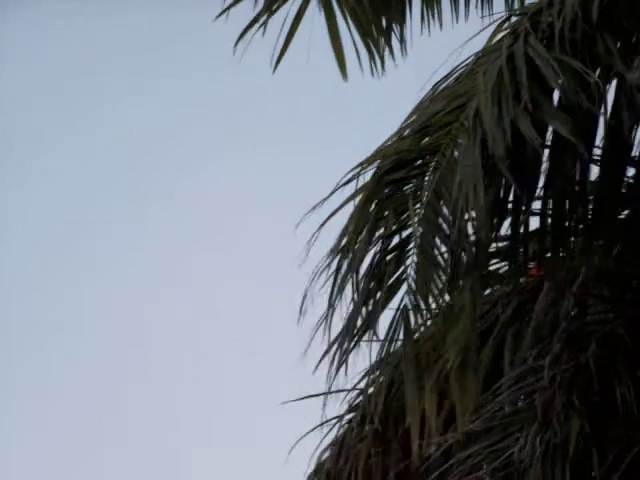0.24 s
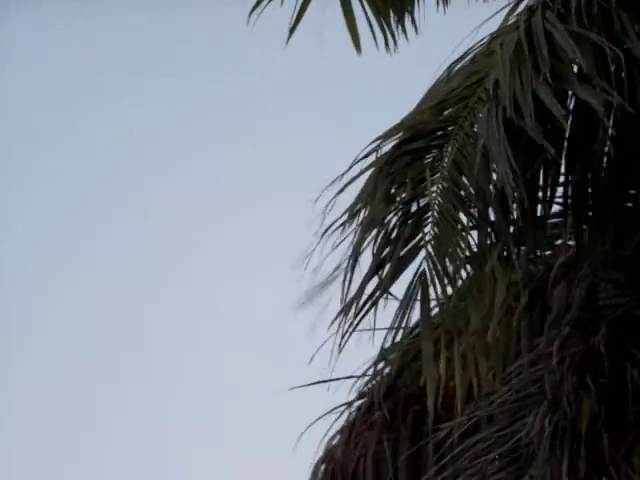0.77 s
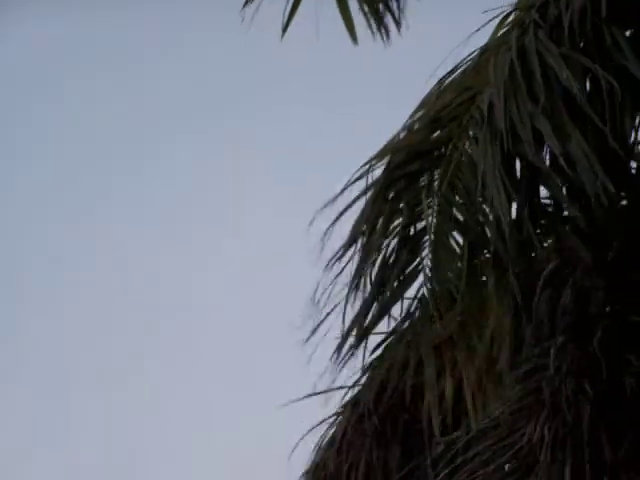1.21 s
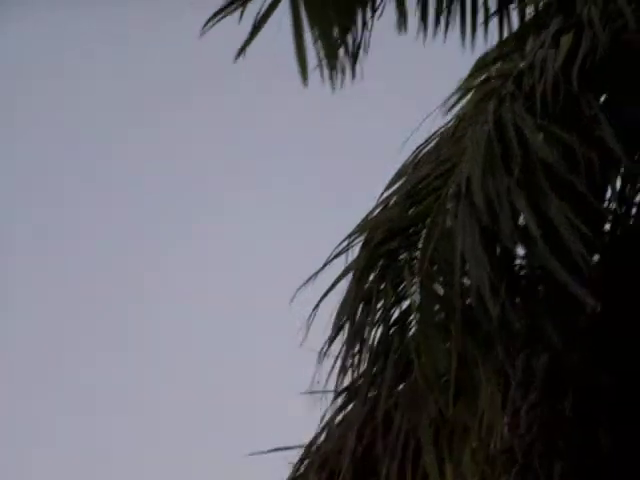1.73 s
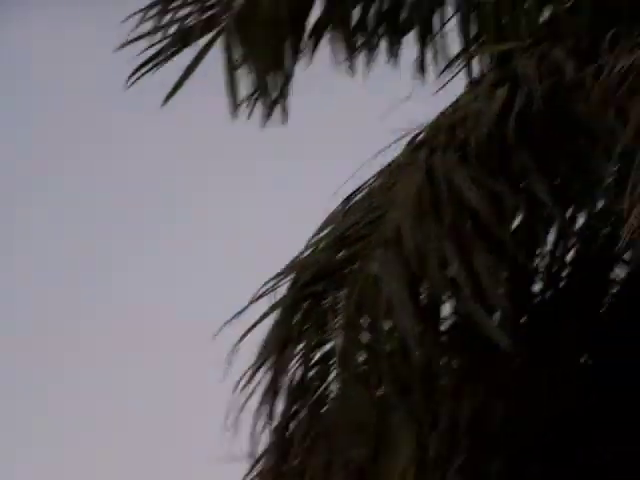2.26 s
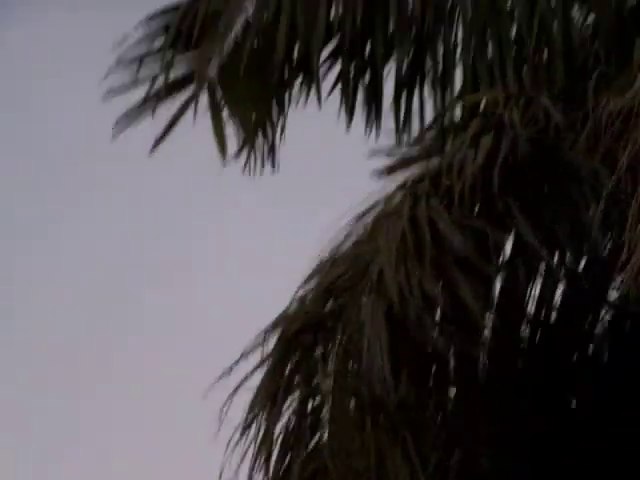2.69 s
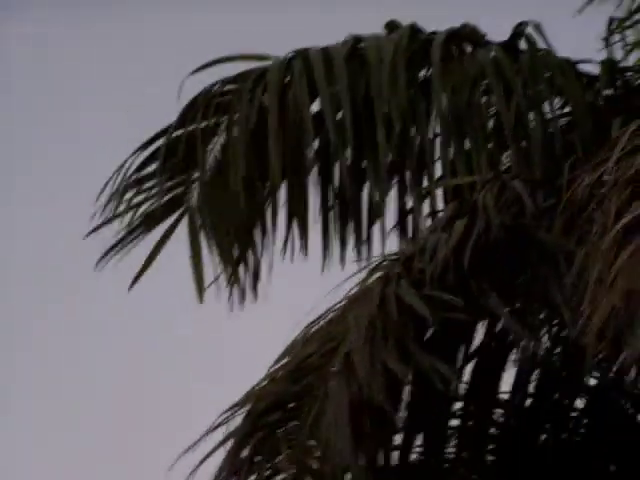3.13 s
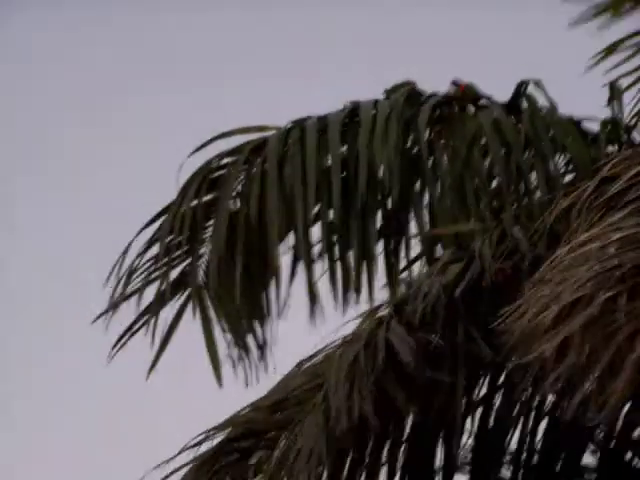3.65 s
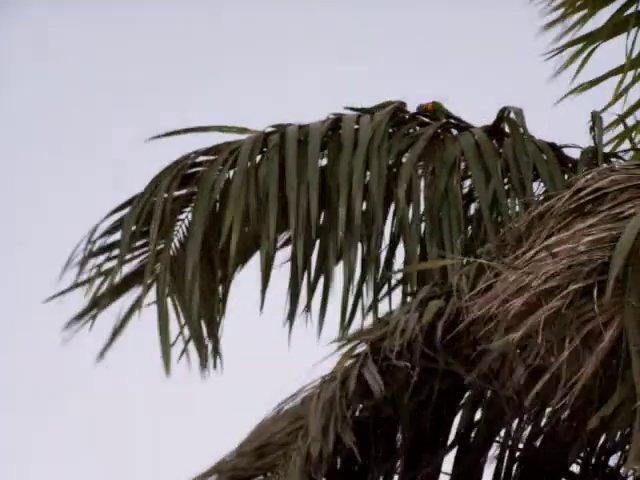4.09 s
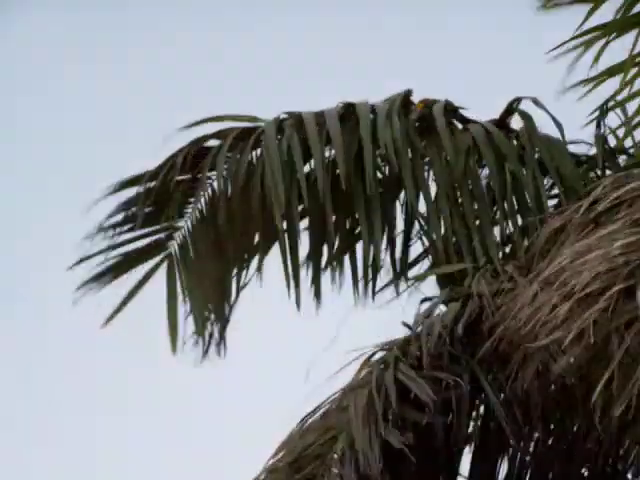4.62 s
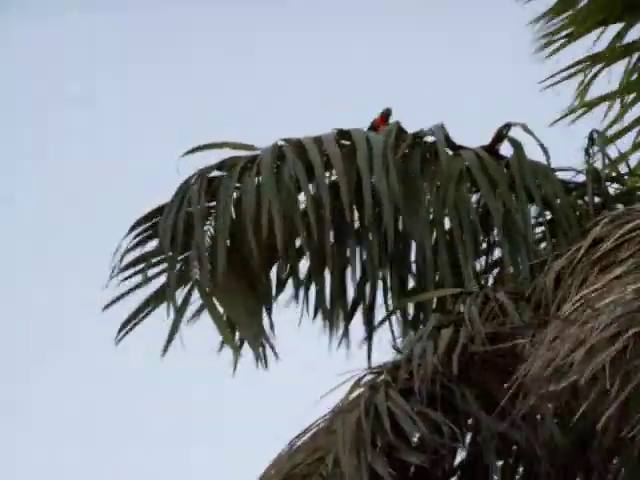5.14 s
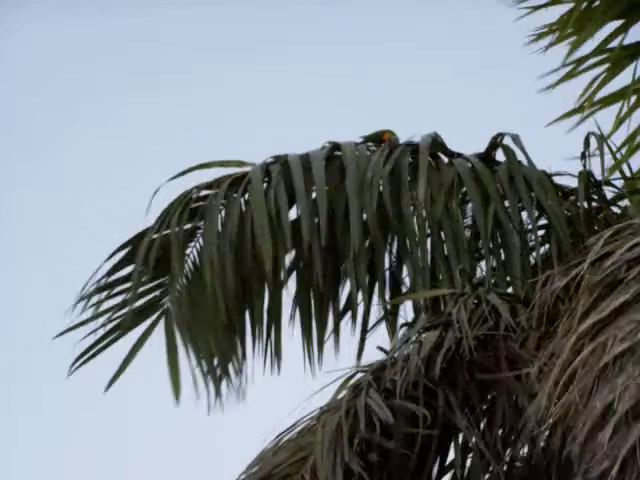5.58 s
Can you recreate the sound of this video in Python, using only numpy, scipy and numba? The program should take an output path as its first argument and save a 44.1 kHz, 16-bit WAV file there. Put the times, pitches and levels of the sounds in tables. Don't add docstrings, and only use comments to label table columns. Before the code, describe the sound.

A big flock of parrots chatters without pause in palm trees beside a road. Close birds throw out very short bent whistles and chirps, with small harsh squawks, over a blurred far crowd. A low truck drone passes early, then a car engine grows until the end. Near five seconds the closest bird trills and swoops. Small camera sound, squashed and gritty with little treble air.

```python
import sys
import numpy as np
from scipy import signal
from scipy.fft import rfft, irfft
from scipy.io import wavfile
from scipy.ndimage import uniform_filter1d
from numba import njit

SR = 44100
rng = np.random.default_rng(int(sys.argv[2]) if len(sys.argv) > 2 else 0)


def wav_record(signal):
    frames = np.transpose(np.atleast_2d(signal))
    bounded = np.clip(frames, -1, 1)
    quanta = np.round(bounded * 32767).astype(np.int16)
    wavfile.write(sys.argv[1], SR, quanta)


def voltage_ratio(level):
    return 10 ** (np.asarray(level, float) / 20)


N = 258867
TIME_S = np.arange(N) / SR
START_S = .0555


def curve(table):
    s, *columns = np.transpose(table)
    return [np.interp(TIME_S, s, c) for c in columns]


def unit(x):
    return x / np.sqrt(np.mean(x ** 2))


def colour(x, points):
    hz, db = np.transpose(points)
    grid_hz = np.fft.rfftfreq(N, 1 / SR) + 1
    gain = voltage_ratio(np.interp(np.log(grid_hz), np.log(hz), db))
    return unit(irfft(rfft(x) * gain, N))


def flutter(low_hz, high_hz):
    band = signal.butter(2, [low_hz, high_hz], "bandpass", fs=SR, output="sos")
    return unit(signal.sosfilt(band, rng.standard_normal(N)))


def fade_in_db():
    end_s = 0.23
    return -12 * np.clip((end_s - TIME_S) / (end_s - START_S), 0, 1)


@njit
def whistle(rows, shake, wobble, rasp, octave, edge_s, hook):
    out = np.zeros(len(shake))
    for start_s, length_s, first_hz, middle_hz, last_hz, gain, place in rows:
        first, size = int(start_s * SR), int(length_s * SR)
        phase = place
        slope = 4 * middle_hz - 3 * first_hz - last_hz
        curvature = 2 * (first_hz + last_hz - 2 * middle_hz)
        for i in range(min(size, len(out) - first)):
            u = i / size
            k = (int(place) + i) % len(out)
            tension = min(1., i / (edge_s * SR), (size - i) / (edge_s * SR))
            hz = first_hz + u * slope + u * u * curvature
            hz *= 1 - hook * (1 - tension) ** 2
            phase += 2 * np.pi * hz * (1 + wobble * shake[k]) / SR
            swell = np.sqrt(tension) * (1 + rasp * shake[-k - 1])
            out[first + i] += gain * swell * (np.sin(phase) + octave * np.sin(2 * phase))
    return out


def echo(x, t60_s, first_s):
    t = np.arange(int(.9 * SR)) / SR
    tail = rng.standard_normal(len(t)) * voltage_ratio(-60 * t / t60_s) * (t > first_s)
    return signal.fftconvolve(x, tail / np.sqrt(np.sum(tail ** 2)))[:N]


def chatter(shake, wobble, rasp, length_s, bend, scatter_db, count):
    pitch, start, length, first, last, level, place = rng.random((7, count))
    hz = 1800 + 6000 * pitch
    first_hz = hz * (1 - bend * (first - .3))
    last_hz = hz * (1 - bend * (last - .3))
    gain = voltage_ratio(-scatter_db * np.log(1 - .97 * level))
    rows = np.c_[start * N / SR, length_s * (.5 + 1.5 * length ** 2), first_hz, hz, last_hz, gain, place * N]
    return unit(whistle(rows, shake, wobble, rasp, .0, 0.0051, .12))


# freq_hz, density_db (dB per Hz)
CROWD = [(880, -13.5), (1500, -7), (1820, -23.5), (2110, -17), (2430, -9), (2840, -2.5), (3330, -5),
         (3890, -3), (4930, -9.5), (5840, -13), (8000, -28), (10400, -61), (17600, -120)]
# time_s, level_db
FLOCK = [(.3, -21.5), (.59, -19.5), (1.17, -19), (1.76, -18.5), (1.85, -21), (2.24, -19.5), (2.7, -19.5),
         (2.9, -18), (3.2, -18.5), (3.75, -18), (3.92, -21.5), (4.03, -19), (4.36, -17.5), (4.62, -22),
         (4.91, -21.5), (5.11, -18.5), (5.53, -21), (5.87, -17)]
# time_s, dropout_share (0-1)
HUSH = [
    (4.8, 0.03),
    (5.03, 0.5),
    (5.25, 0.1),
    (5.5, .55),
    (5.7, .1),
]


def far_crowd():
    steep = chatter(flutter(60, 500), .004, .3, length_s=.015, bend=.4, scatter_db=1.0, count=1900)
    clear = chatter(flutter(60, 500), .005, .4, length_s=.02, bend=.25, scatter_db=.5, count=1200)
    harsh = chatter(flutter(150, 900), .05, .9, length_s=.05, bend=.15, scatter_db=1.5, count=600)
    crowd = steep + voltage_ratio(-1.5) * clear + voltage_ratio(-8) * harsh
    smeared = crowd + voltage_ratio(-6) * echo(crowd, t60_s=.6, first_s=.013)
    heard = colour(smeared, CROWD)
    treble = signal.butter(2, 5200, "highpass", fs=SR, output="sos")
    heard = heard - np.clip(curve(HUSH)[0], 0, 1) * signal.sosfiltfilt(treble, heard)
    return voltage_ratio(curve(FLOCK)[0] + fade_in_db() - 1.0) * heard


# time_s, level_db
ROAD = [(.3, -36), (.59, -29.5), (1.17, -35.5), (1.76, -32.5), (1.9, -33.5), (2.9, -31), (2.97, -36.5),
        (4.5, -36), (4.72, -31.5), (4.91, -37.5), (4.98, -31), (5.11, -39.5), (5.67, -37), (5.87, -32)]
# freq_hz, density_db (dB per Hz)
TRAFFIC = [(15, -46.5), (25, -35.5), (81, -11.5), (129, -17.5), (162, -20), (401, -18.5), (1010, -8.5),
           (1840, -10.5), (2140, -12), (2500, -2.5), (3250, -3.5), (5500, -120)]
# freq_hz, density_db (dB per Hz)
TYRE_RING = [(170, -44), (235, -3), (262, -4.5), (292, -1.5), (380, -36)]


def traffic():
    level_db = curve(ROAD)[0] + fade_in_db()
    wash_db = level_db + 4.5 + 1.05 * flutter(1.6, 16.3)
    wash = voltage_ratio(wash_db) * colour(rng.standard_normal(N), TRAFFIC)
    return wash + voltage_ratio(level_db - 20.5) * colour(rng.standard_normal(N), TYRE_RING)


# time_s, hum_hz, level_db
IDLER = [
    (.1, 233.6, -62),
    (2.0, 233.7, -57),
    (2.3, 235, -61),
    (2.7, 232, -49.5),
    (3.0, 234, -73),
]


def idler():
    hz, db = curve(IDLER)
    phase = 2 * np.pi * np.cumsum(hz * (1 + 0.0078 * flutter(1, 8))) / SR
    return np.sqrt(2) * voltage_ratio(db + 2.5 * flutter(2, 10)) * np.sin(phase)


def bend(table, first_share, last_share):
    s, length, hz, db = np.transpose(table)
    return np.c_[s + .003, length - .003, hz * (1 + first_share), hz, hz * (1 + last_share), db]


def voiced(rows):
    return np.c_[rows[:, :5], np.sqrt(2) * voltage_ratio(rows[:, 5]), rng.random(len(rows)) * N]


# start_s, length_s, middle_hz, level_db
FALLING = [(3.135, 0.024, 4810, -29.5), (5.768, .027, 4230, -24.5), (.173, 0.04, 5930, -36),
           (.276, .027, 4750, -23.5), (.831, .024, 5580, -15.5), (.93, .02, 5620, -17),
           (1.264, 0.055, 2390, -29), (1.397, .032, 3160, -19), (1.57, .035, 3455, -22.5),
           (1.893, 0.025, 4450, -20), (2.561, 0.03, 5400, -27), (3.738, 0.024, 4500, -25),
           (2.195, 0.018, 6500, -33), (2.367, 0.031, 3080, -22), (2.421, 0.031, 3295, -24.5),
           (2.426, 0.032, 6440, -32), (2.435, 0.032, 2540, -23), (3.163, 0.041, 4320, -23),
           (3.64, 0.024, 4500, -23), (4.354, 0.078, 6520, -31), (5.788, 0.07, 3095, -18.5)]
RISING = [(.265, .015, 4270, -19.5), (1.146, .044, 4010, -23.5), (4.225, .07, 4400, -23),
          (5.0, .048, 4020, -21), (5.372, 0.027, 3830, -20), (3.037, 0.045, 2850, -22),
          (3.187, 0.054, 4390, -24), (4.14, 0.045, 5000, -26), (5.196, 0.031, 3825, -23),
          (5.205, 0.05, 2800, -25), (5.837, 0.07, 3110, -18)]
# start_s, length_s, middle_hz, level_db
HOOKS = [(3.297, 0.027, 5590, -25), (3.958, 0.028, 4480, -25), (.28, .037, 5970, -26.5),
         (.904, 0.035, 5840, -18.5), (.976, 0.023, 5840, -18.5), (1.186, 0.014, 4280, -23.5),
         (1.773, 0.038, 5630, -18), (1.815, 0.04, 4680, -17), (1.849, 0.024, 5620, -16),
         (2.972, 0.035, 5950, -20.5), (3.226, 0.041, 5800, -28.5), (5.427, 0.021, 5190, -21),
         (1.868, 0.03, 4600, -19)]
# start_s, length_s, middle_hz, level_db
HELD = [(.326, 0.04, 3435, -18.5), (.612, 0.076, 4820, -27.5), (.853, 0.064, 4450, -23),
        (.952, 0.036, 4690, -17), (1.718, .056, 4320, -21), (1.047, 0.04, 3640, -24),
        (.545, 0.04, 1330, -36), (1.04, 0.03, 5850, -29), (1.65, 0.027, 5930, -28),
        (1.806, 0.026, 5130, -24), (.595, .04, 1230, -37), (2.648, 0.04, 3586, -22),
        (4.724, 0.022, 4210, -19), (2.954, 0.016, 5430, -19.5), (2.995, 0.018, 5400, -24),
        (3.277, 0.023, 3860, -19), (3.608, 0.031, 4830, -20), (5.178, 0.025, 6510, -29),
        (3.772, 0.067, 2730, -25.5), (4.075, 0.068, 6260, -30), (4.091, 0.038, 3100, -22),
        (5.138, 0.029, 6550, -25), (4.58, 0.04, 5720, -28), (4.875, 0.12, 3960, -29),
        (4.938, 0.045, 6800, -33), (5.029, 0.022, 4980, -21), (5.292, 0.031, 2948, -24)]
# start_s, length_s, middle_hz, level_db
DIVES = [(.379, 0.044, 3030, -23.5), (.415, 0.03, 3250, -19), (.609, 0.077, 3160, -25),
         (.705, 0.055, 2700, -26.5), (1.207, .043, 3740, -23), (1.265, 0.026, 3870, -20),
         (1.384, 0.013, 3520, -19.5), (2.624, .026, 4200, -21), (3.352, 0.022, 4510, -22.5),
         (3.977, .04, 3410, -23.5), (5.397, 0.03, 4320, -24), (2.013, 0.015, 7070, -38),
         (2.285, 0.028, 3120, -22.5), (3.841, 0.036, 3145, -17.5), (4.666, .029, 2696, -25),
         (5.211, .019, 4020, -22.5), (5.362, 0.035, 5600, -29), (5.827, 0.027, 5720, -24)]
# start_s, length_s, middle_hz, level_db
SWOOPS = [(3.41, 0.038, 2955, -30), (3.51, 0.054, 3330, -37.5), (.467, 0.026, 3500, -21),
          (.476, 0.047, 3010, -18), (1.315, 0.045, 2936, -27.5), (2.17, 0.031, 3335, -26),
          (2.905, 0.07, 5300, -26), (2.141, .058, 6230, -27), (2.355, .016, 6600, -30),
          (3.589, 0.021, 2653, -25.5), (4.271, 0.024, 2567, -24.5), ]
# start_s, length_s, middle_hz, level_db
DIPS = [
    (.794, 0.031, 5000, -30),
    (2.282, 0.013, 3490, -18),
    (2.525, 0.05, 2800, -26.5),
    (3.898, 0.1, 2510, -26.5),
    (4.256, .009, 4360, -23),
    (4.496, 0.018, 4040, -20),
]
# start_s, length_s, middle_hz, level_db
ARCHES = [(.814, 0.03, 4800, -22.5), (1.212, .034, 6030, -27), (1.085, 0.034, 6080, -26),
          (1.704, 0.022, 5480, -23), (1.97, 0.03, 5910, -18.5), (2.557, 0.059, 3570, -18.5),
          (2.775, .017, 4230, -21), (3.84, .024, 4170, -26.5), (3.565, 0.022, 4890, -23),
          (3.708, 0.054, 4550, -26.5), (4.48, 0.031, 2540, -27), (4.498, .037, 2645, -24.5),
          (5.33, 0.04, 4640, -26)]
# start_s, length_s, middle_hz, level_db
SETTLES = [(3.252, 0.015, 4220, -24.5), (3.548, 0.058, 2605, -30.5), (1.43, 0.04, 3600, -25),
           (2.038, 0.079, 3910, -19.5), (2.203, 0.084, 3565, -21.5), (3.28, 0.06, 2750, -23),
           (3.789, 0.047, 3250, -17.5), (4.008, .04, 2726, -19.5), (4.372, 0.06, 3250, -19.5)]
# start_s, top_hz, end_sag (0-1), level_db
TRILL = [
    (4.741, 5680, .06, -24),
    (4.757, 5800, .03, -18.5),
    (4.781, 6100, .015, -24),
    (4.807, 6030, .04, -21),
    (4.822, 6040, .07, -22),
    (4.836, 6080, .06, -23),
    (4.848, 5980, .05, -26),
    (4.861, 6080, .035, -19),
    (4.883, 5900, .075, -19.5),
]


def near_birds():
    s, hz, sag, db = np.transpose(TRILL)
    trill_end_s = 4.916
    trill = np.c_[s, np.diff(np.r_[s, trill_end_s]), hz * (1 - sag), hz, hz * (1 - sag), db]
    calls = np.r_[bend(FALLING, .04, -.045), bend(RISING, -.045, .044), bend(HOOKS, -.055, 0),
                  bend(HELD, .00062, -.001), bend(DIVES, .1, -.11), bend(SWOOPS, -.105, .105),
                  bend(DIPS, .07, .065), bend(ARCHES, -.045, -.045), bend(SETTLES, .05, -.01)]
    far = calls[:, 5] < -22
    near_rows, far_rows = voiced(np.r_[trill, calls[~far]]), voiced(calls[far])
    shake = flutter(70, 500)
    notes = whistle(near_rows, shake, .005, .28, voltage_ratio(-27), .003, .07)
    notes = notes + whistle(far_rows, shake, .006, .38, voltage_ratio(-27), .004, .08)
    return notes + voltage_ratio(-14) * echo(notes, t60_s=0.14, first_s=0.012)


def engine(table, skirt_db, thud_db, fourth_db):
    hz, db, ring = curve(table)
    phase = 2 * np.pi * np.cumsum(hz * (1 + 0.0044 * flutter(1.3, 12))) / SR
    arriving = np.clip((TIME_S - table[0][0]) / 0.27, 0, 1)
    leaving = np.clip((table[-1][0] + 0.16 - TIME_S) / .15, 0, 1)
    sound = np.sqrt(2) * voltage_ratio(thud_db) * np.cos(phase)
    sound = sound + voltage_ratio(db + fourth_db) * np.cos(4 * phase)
    for k in (1, 2, 3):
        level_db = db - skirt_db * abs(np.log2(k / ring))
        sound = sound + np.sqrt(2) * voltage_ratio(level_db) * np.sin(k * phase)
    return arriving * leaving * sound


# time_s, firing_hz, level_db, ring_multiple (of firing rate)
TRUCK = [
    (.2, 51.53, -41, 2.9),
    (.58, 52.23, -43, 2.9),
    (.64, 51.6, -38, 2.45),
    (.75, 51.05, -34, 2.55),
    (1.06, 51.97, -43.5, 2.05),
    (1.5, 52.37, -40, 2.05),
    (2.2, 53.2, -51.5, 1.95),
    (2.46, 56.2, -51.5, 1.9),
    (2.8, 53.7, -65.5, 1.9),
    (3.25, 56.6, -66, 1.9),
]


def truck():
    return engine(TRUCK, skirt_db=20.5, thud_db=-56.5, fourth_db=-23.5)


# start_s, length_s, first_hz, last_hz, level_db
EARLY_CHIRPS = [(0.298, 0.019, 3900, 3530, -21.5), (0.351, 0.025, 2590, 2670, -19.5),
                (0.59, 0.026, 4960, 4930.0, -26), (0.639, 0.021, 5850, 5900, -32.5),
                (0.641, 0.021, 4150, 4370, -22), (0.643, 0.03, 6440, 6130, -33.5),
                (0.768, 0.019, 2435, 2374, -26), (0.929, 0.034, 3960, 4090, -19.5),
                (1.273, 0.019, 3850, 3520, -24), (1.315, 0.035, 3640, 3670, -27),
                (1.357, 0.031, 3260, 3040, -21.5), (1.384, 0.02, 4130, 4310, -21.5),
                (1.403, 0.036, 5640, 5690, -26), (1.488, 0.026, 3400, 3250, -21),
                (1.593, 0.021, 2384, 2440.0, -27.0), (1.599, 0.026, 5120, 4810, -28.0),
                (1.66, 0.018, 2500, 2650, -23), (1.92, 0.045, 5620, 5560, -31),
                (1.901, 0.036, 3790, 3800, -24.5), (1.978, 0.021, 2323, 2200, -25),
                (2.065, 0.018, 3620, 3480, -21.5), (2.158, 0.06, 5000, 5000, -28.5),
                (2.166, 0.024, 3096, 2890, -26), (2.303, 0.035, 4150, 4500, -21),
                (2.35, 0.024, 3190, 3170, -21), (2.445, 0.045, 4000, 4650, -25),
                (2.561, 0.04, 3030, 3150, -20.5), (2.664, 0.023, 4940.0, 4990, -25),
                (2.678, 0.05, 4250, 3300, -22), (2.687, 0.04, 5000, 5050, -25.5),
                (2.688, 0.022, 2790, 2850, -22), (2.711, 0.033, 7000, 6640, -35.0),
                (2.758, 0.019, 4900, 4780, -22.5), (2.766, 0.02, 2600, 2436, -26.5),
                (2.8, 0.056, 4720, 4800, -24), (2.79, 0.058, 2560, 2720, -24),
                (2.858, 0.023, 4000, 4070, -21), (2.96, 0.034, 6770, 6830, -34.5),
                (3.005, 0.03, 4500, 3900, -23)]
# start_s, length_s, first_hz, last_hz, level_db
LATE_CHIRPS = [(3.064, 0.018, 2946, 2910, -28.5), (3.119, 0.022, 6080, 5980.0, -28),
               (3.265, 0.02, 6220, 6250, -33.5), (3.318, 0.023, 4650, 4740, -24.5),
               (3.327, 0.022, 4320, 4460, -20.5), (3.34, 0.02, 5000, 4880, -23),
               (3.418, 0.016, 6100, 5600, -28), (3.413, 0.019, 4860.0, 4760, -26),
               (3.562, 0.025, 3316, 3270, -26.5), (3.69, 0.026, 4200, 3700, -22),
               (3.695, 0.018, 5670, 5560, -31), (3.796, 0.026, 6040, 5910.0, -29.5),
               (3.827, 0.021, 5440, 5310.0, -27.5), (3.982, 0.018, 2380, 2650, -16.5),
               (4.03, 0.025, 3470, 3170, -28.5), (4.053, 0.019, 5110, 5050, -30),
               (4.086, 0.02, 5670, 5370.0, -29), (4.118, 0.021, 2810, 2780, -24),
               (4.169, 0.023, 4000, 4130, -27.5), (4.174, 0.02, 4850, 4840, -25.5),
               (4.213, 0.016, 5980.0, 5840, -24), (4.256, 0.02, 2700, 2520.0, -24.5),
               (4.286, 0.033, 5830, 5580, -32), (4.29, 0.018, 2840, 2920, -22.5),
               (4.482, 0.02, 3820, 3650.0, -21.5), (4.554, 0.019, 3090, 2950, -22.5),
               (4.575, 0.025, 2427, 2670, -24.5), (4.709, 0.02, 2960, 2910, -22.5),
               (4.714, 0.018, 4860, 4910.0, -27.5), (4.739, 0.022, 2530, 2480, -28.5),
               (4.803, 0.035, 3890, 3840.0, -24), (4.969, 0.015, 7000.0, 7030, -34.5),
               (5.079, 0.025, 3090, 3030, -21), (5.178, 0.022, 4490, 4610, -24),
               (5.338, 0.022, 4080, 3900, -23), (5.325, 0.027, 2978, 3015, -20.5),
               (5.573, 0.022, 2824, 2820, -22), (5.684, 0.023, 5340, 5450, -33),
               (5.771, 0.018, 3090, 3300, -26), (5.775, 0.024, 2790, 2696, -19)]
# time_s, pitch_hz, level_db
ARCH_CALL = [
    (3.893, 3650, -25),
    (3.91, 4020, -21),
    (3.922, 3900, -22),
    (3.934, 3300, -25),
]
# time_s, pitch_hz, level_db
LAUNCH = [
    (4.753, 3600, -28),
    (4.758, 5600, -25),
    (4.762, 7900, -33),
]
# time_s, pitch_hz, level_db
LOOP_CALL = [
    (5.046, 4100, -27),
    (5.055, 4350, -21),
    (5.062, 5600, -23),
    (5.075, 5550, -19),
    (5.082, 4200, -38),
    (5.1, 3760, -17.5),
    (5.12, 3900, -22),
    (5.122, 5050, -17),
    (5.142, 6350, -30),
]
# time_s, pitch_hz, level_db
SAG_CALL = [
    (5.447, 4430, -21),
    (5.462, 4850, -20),
    (5.473, 4850, -27),
    (5.48, 4230, -28),
    (5.503, 4090, -19),
    (5.559, 3880, -17.5),
    (5.568, 5150, -34),
    (5.592, 5500, -21),
    (5.6, 5450, -30),
]


def swoop(table):
    hz, db = curve(table)
    gate = np.clip(np.minimum(TIME_S - table[0][0], table[-1][0] - TIME_S) / .003, 0, 1)
    hz = uniform_filter1d(hz, size=70) * (1 + .006 * flutter(70, 500))
    gain = np.sqrt(2) * voltage_ratio(db + 2.5 + 1.5 * flutter(40, 300))
    return gain * gate * np.sin(2 * np.pi * np.cumsum(hz) / SR)


def neighbours():
    s, length, first, last, db = np.r_[EARLY_CHIRPS, LATE_CHIRPS].T
    rows = voiced(np.c_[s, length, first, (first + last) / 2, last, db - 1.5])
    notes = whistle(rows, flutter(70, 500), .006, .38, voltage_ratio(-27), .004, .07)
    nearest = swoop(ARCH_CALL) + swoop(LAUNCH) + swoop(LOOP_CALL) + swoop(SAG_CALL)
    return nearest + notes + voltage_ratio(-10) * echo(notes + nearest / 2, t60_s=0.07, first_s=0.023)


# start_s, peak_db, length_s
SQUAWKS = [(0.511, -29.5, 0.02), (0.683, -22.5, 0.027), (1.074, -36, 0.07), (2.362, -31.5, 0.011),
           (2.494, -27.5, 0.016), (2.908, -37.5, 0.014), (3.284, -23.5, 0.022), (4.142, -36, 0.016),
           (4.223, -24.5, 0.022), (4.477, -27.5, 0.02), (4.735, -34, 0.022), (5.035, -30.5, 0.016),
           (5.189, -34.5, 0.024), (5.349, -22.5, 0.023)]


def squawks():
    s, db, length = np.transpose(SQUAWKS)
    hz = 3600 * (1 + 0.065 * rng.standard_normal(len(s)))
    place = rng.random(len(s)) * N
    rows = np.c_[s, np.maximum(length, .008), hz, 1.03 * hz, .97 * hz, voltage_ratio(db + 1.5), place]
    return whistle(rows, flutter(320, 820), 0.2, 0.22, voltage_ratio(-10.0), 0.0047, .0)


# time_s, firing_hz, level_db, ring_multiple (of firing rate)
CAR = [(1.6, 88.35, -49, 1.1), (2.5, 87.2, -39, 1.27), (3.0, 86.5, -43, 1.4), (3.6, 86.1, -35.5, 1.45),
       (4.1, 84.9, -34.5, 1.26), (4.35, 85.15, -27.5, 1.45), (4.47, 85, -29.5, 1.2),
       (4.53, 84.37, -23, 1.43), (4.68, 83.65, -20.5, 1.35), (4.85, 83.8, -25, 1.41),
       (5.0, 82.5, -22, 1.47), (5.4, 81.6, -20, 1.486), (5.87, 82.9, -13.5, 1.39)]


def car():
    return engine(CAR, skirt_db=34.5, thud_db=-68, fourth_db=-35.5)


def scene():
    road = traffic() + idler() + truck() + car()
    birds = far_crowd() + near_birds() + neighbours() + squawks()
    return (birds + road)[None]


@njit
def follow(x, attack, release):
    e, out = .05, np.empty(len(x))
    for i in range(len(x)):
        e += (abs(x[i]) - e) * (attack if abs(x[i]) > e else release)
        out[i] = e
    return out


# freq_hz, gain_db
SMOOTHING = [(6500, 0), (7500, 2), (8100, -1.5), (8600, -17), (9000, -34.5), (9300, -62), (9600, -120)]


def converter(x):
    rate_hz = 16000
    grid_hz = np.fft.rfftfreq(N, 1 / SR)
    stored = irfft(rfft(x) * (grid_hz < rate_hz / 2), N)
    mirrored = stored * (1 + 2 * np.cos(2 * np.pi * rate_hz * TIME_S))
    return irfft(rfft(mirrored) * voltage_ratio(np.interp(grid_hz, *np.transpose(SMOOTHING))), N)


def band_limit(x):
    return signal.sosfilt(signal.butter(12, 9070, fs=SR, output="sos"), x)


def record(dry):
    attack_s, release_s = 0.0048, 0.064
    level = follow(dry[0], 1 / (attack_s * SR), 1 / (release_s * SR))
    squeezed = dry[0] * np.minimum(1, voltage_ratio(-15.5) / level) ** 0.93
    octaves = squeezed ** 2 - np.mean(squeezed ** 2)
    bent = np.tanh(1.125 * squeezed) / 1.093 + 0.25 * octaves
    mix = converter(bent)[None] * (np.arange(N) >= START_S * SR)
    return band_limit(mix)


dry = scene()
out = record(dry)
wav_record(out)
```